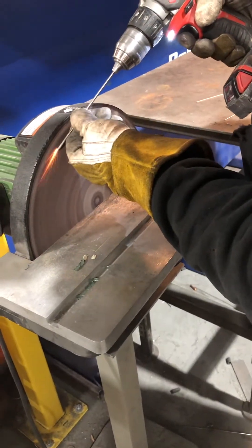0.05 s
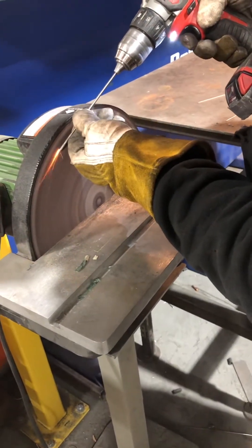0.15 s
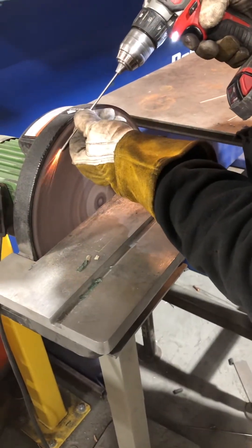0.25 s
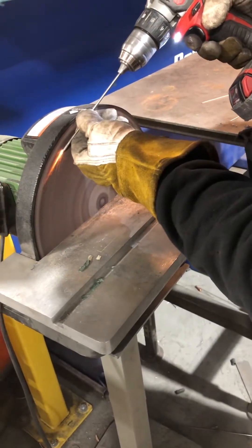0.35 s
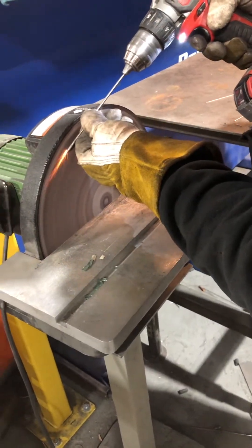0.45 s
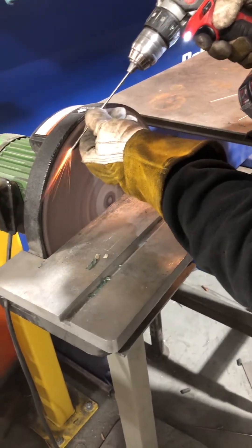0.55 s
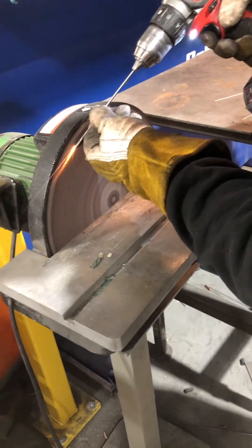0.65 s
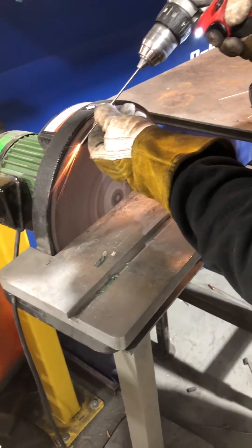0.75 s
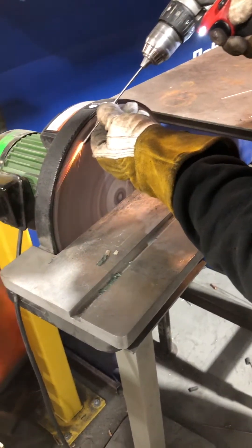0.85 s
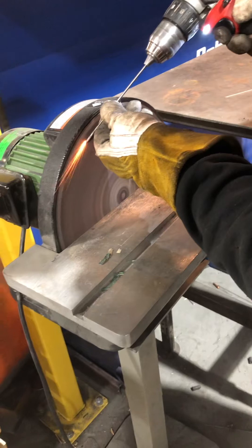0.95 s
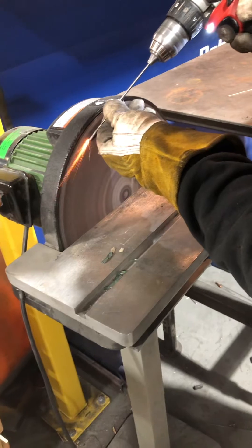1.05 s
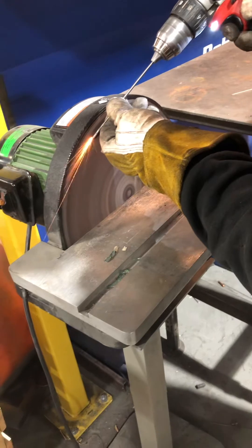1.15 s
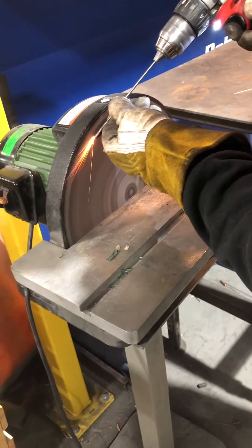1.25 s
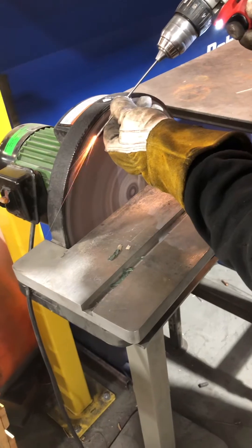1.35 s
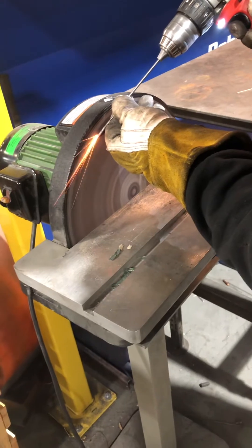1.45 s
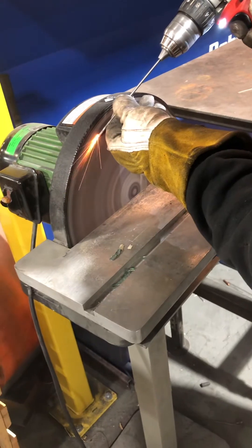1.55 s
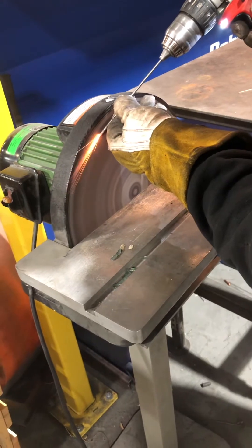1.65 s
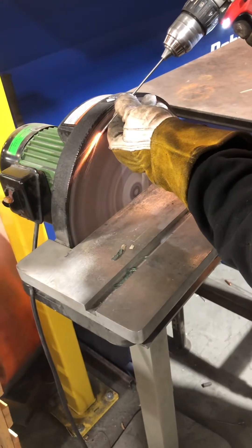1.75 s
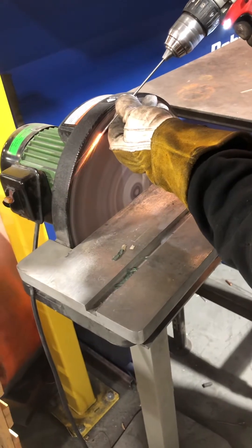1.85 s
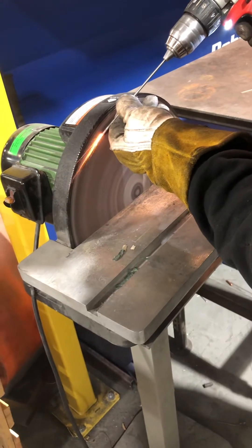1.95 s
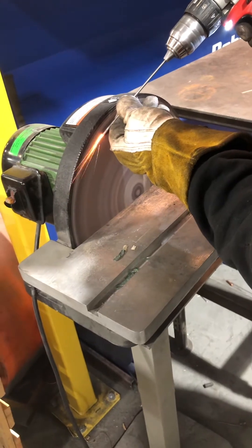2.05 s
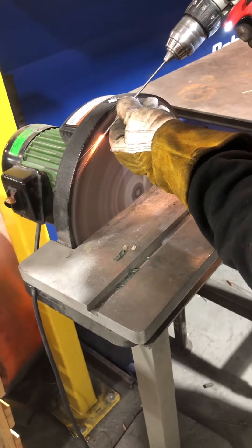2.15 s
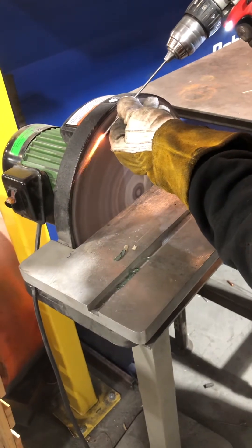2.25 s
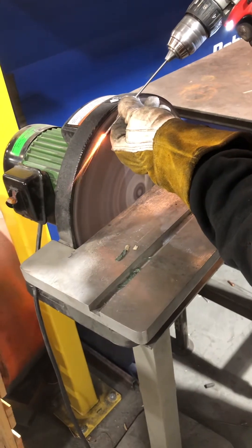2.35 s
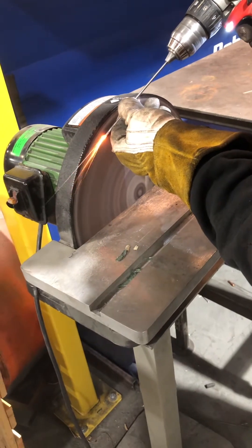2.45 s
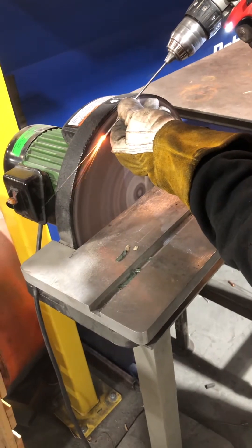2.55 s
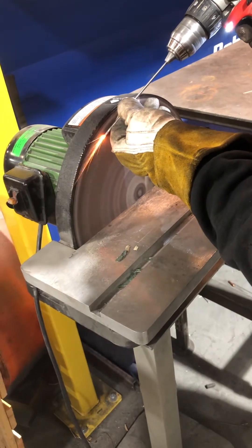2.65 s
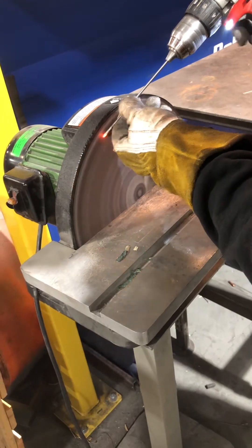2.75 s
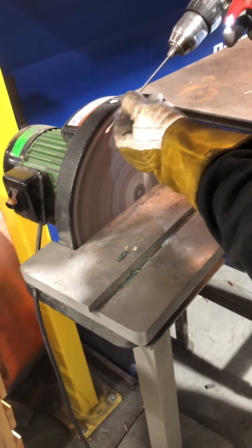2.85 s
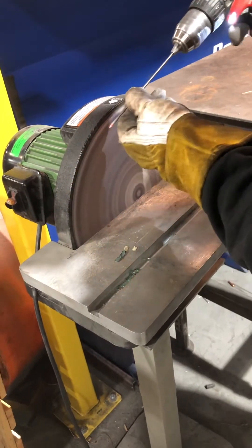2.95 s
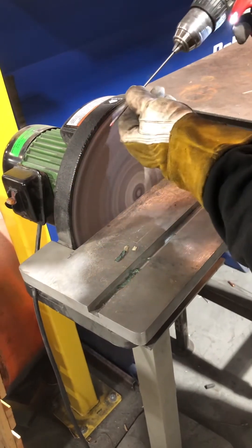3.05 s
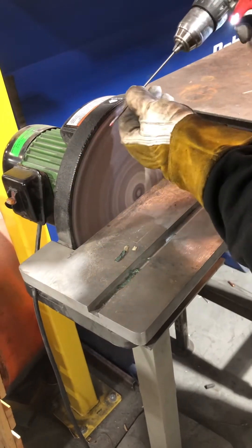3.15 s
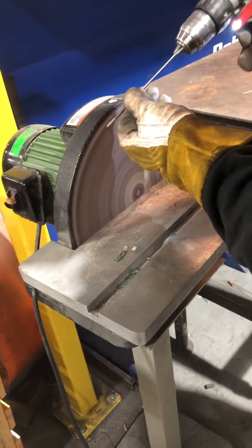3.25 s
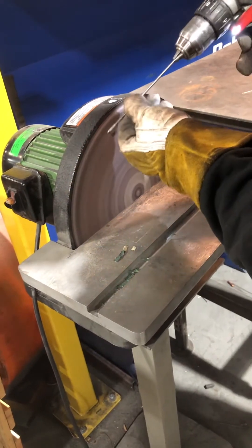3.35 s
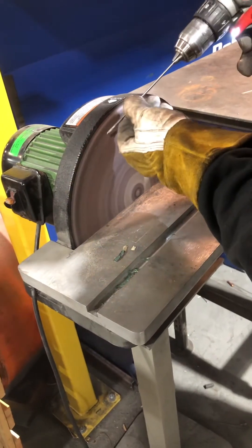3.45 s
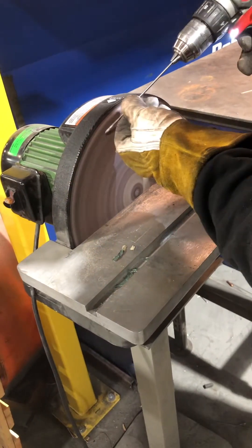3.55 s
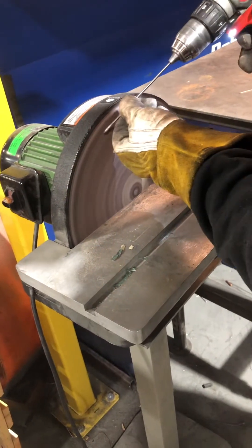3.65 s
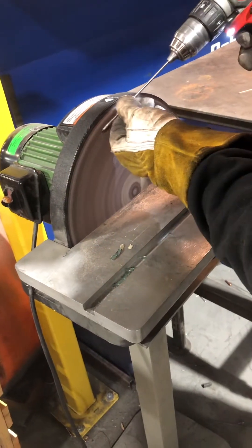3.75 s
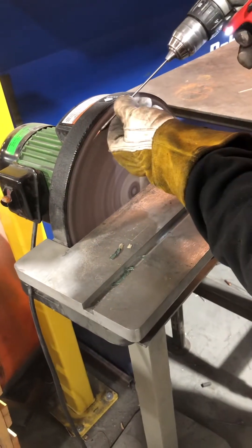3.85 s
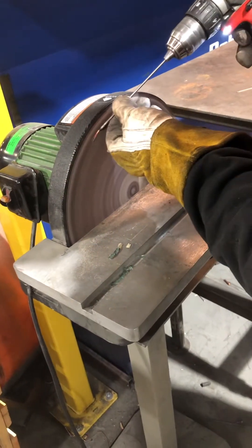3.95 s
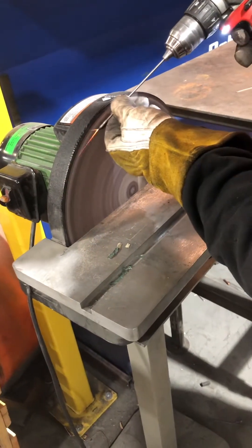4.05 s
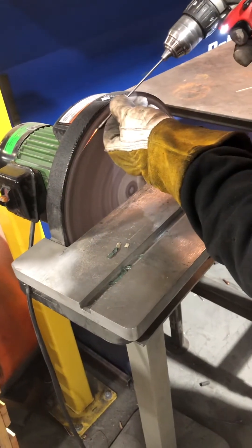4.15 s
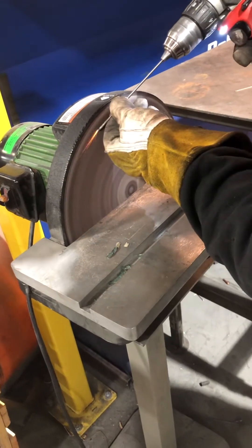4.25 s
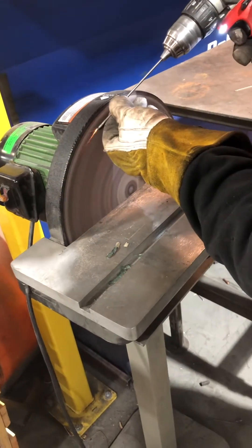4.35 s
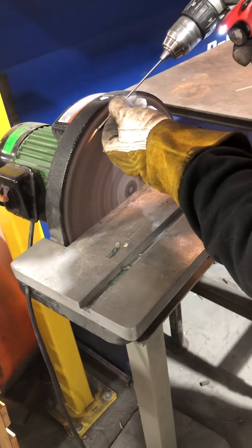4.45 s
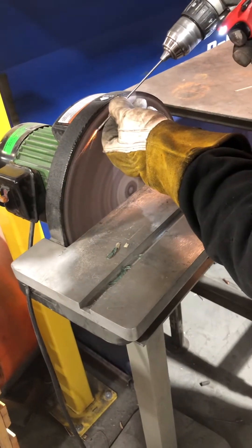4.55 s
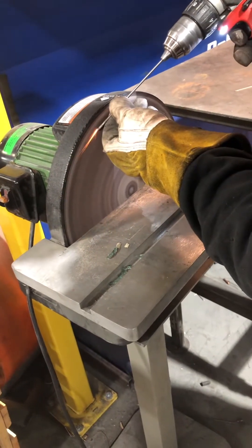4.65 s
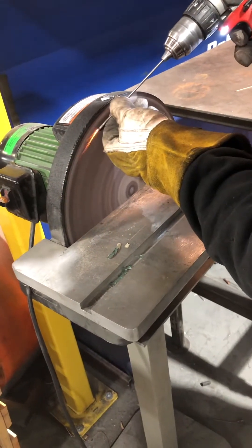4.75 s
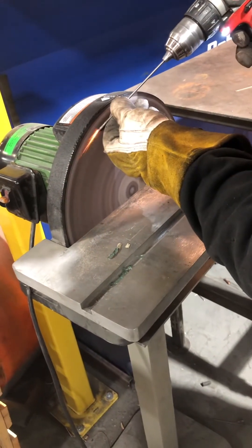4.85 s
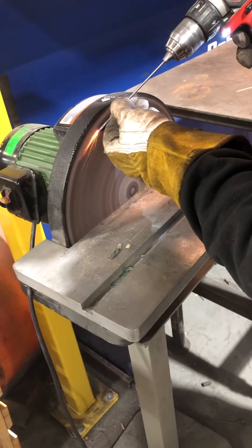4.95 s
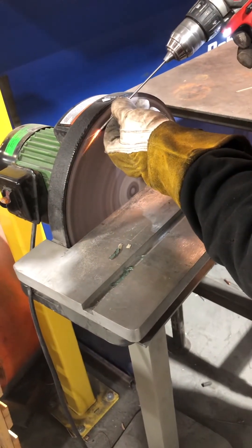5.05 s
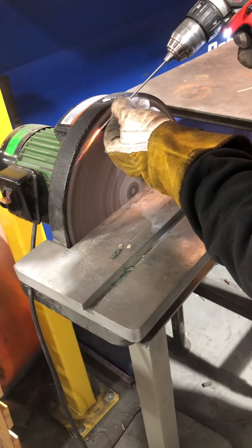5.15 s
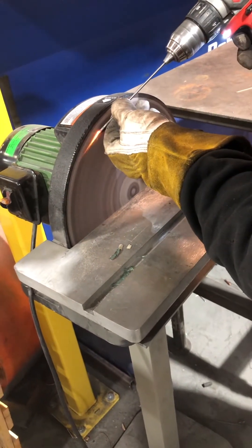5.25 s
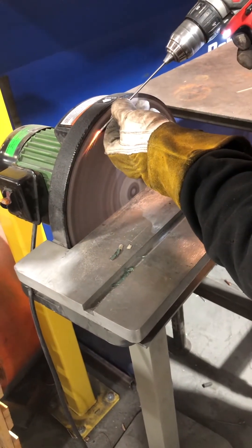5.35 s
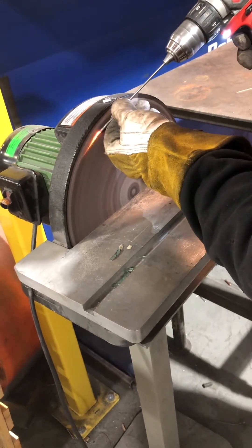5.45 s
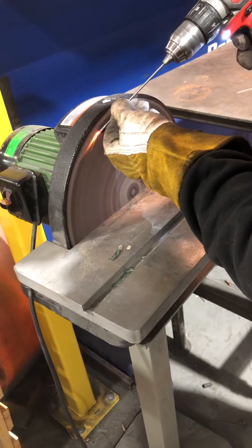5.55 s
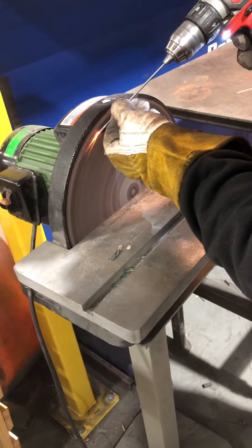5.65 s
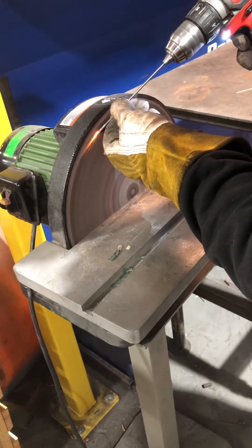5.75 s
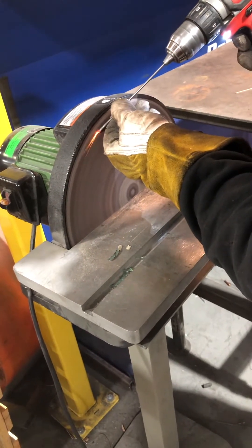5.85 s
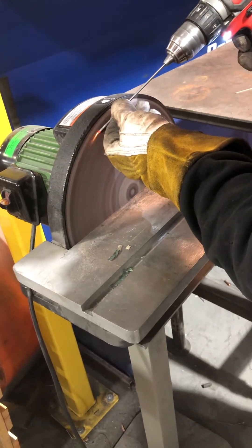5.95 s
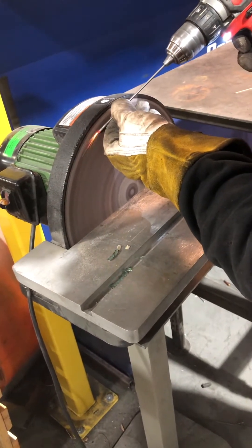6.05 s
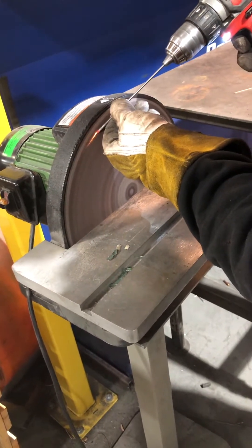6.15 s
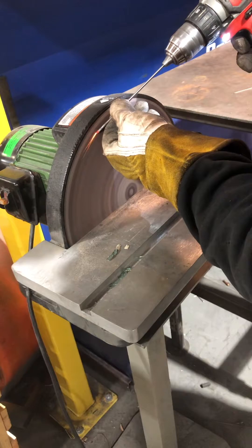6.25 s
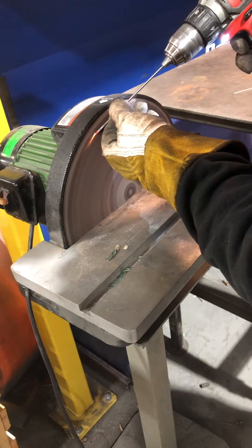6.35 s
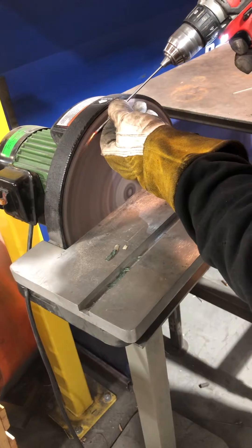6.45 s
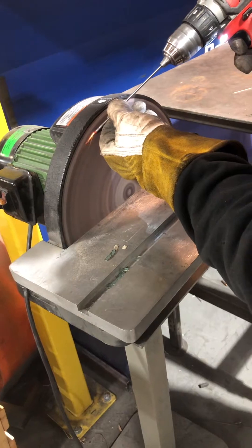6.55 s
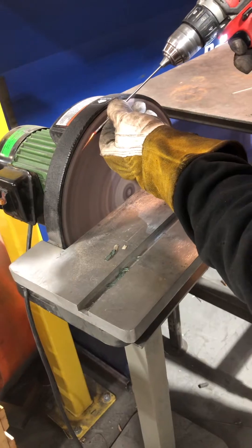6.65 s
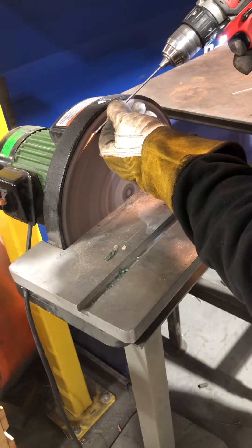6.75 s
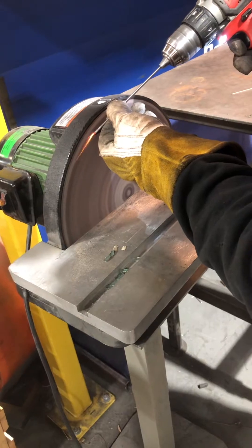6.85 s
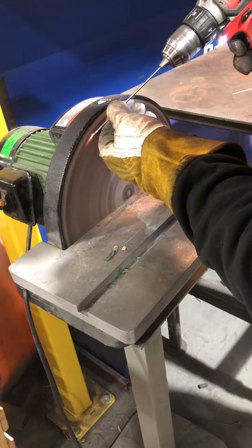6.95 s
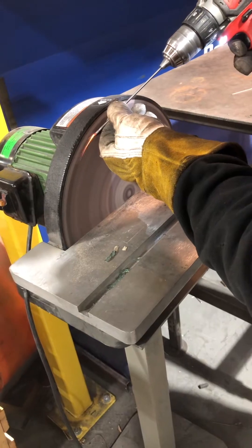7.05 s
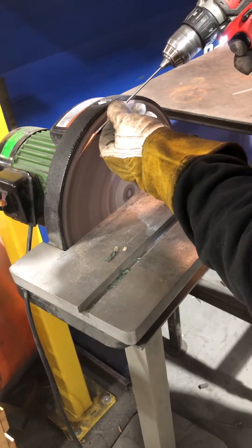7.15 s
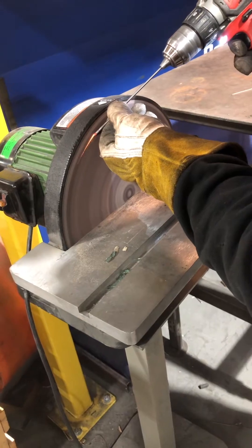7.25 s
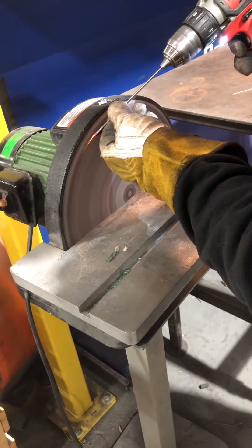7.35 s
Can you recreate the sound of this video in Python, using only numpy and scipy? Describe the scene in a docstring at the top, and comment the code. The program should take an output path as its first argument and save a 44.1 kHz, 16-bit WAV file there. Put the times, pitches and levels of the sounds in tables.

```python
"""At first a thin steel rod, spun by a cordless drill, is held against a running disc sander in a workshop.
The same grit comes round each turn and sets rod and disc ringing; high spots make the hiss throb.
Then the rod is lifted and the drill stops, leaving the sander's hum and rushing air.
The drill winds up with a rising gear tone, the rod skips on the disc, and grinding resumes.
At the end the drill is let go, and the rod lifts off with a short dull rub."""
import sys
import numpy as np
from scipy import signal
from scipy.fft import rfft, irfft, next_fast_len
from scipy.io import wavfile
from scipy.ndimage import uniform_filter1d, map_coordinates

SR = 44100
rng = np.random.default_rng(int(sys.argv[2]) if len(sys.argv) > 2 else 0)


def transcribe(signal):
    """Save signal, clipped to [-1, 1], as a 16-bit WAV file at the path in sys.argv[1]."""
    frames = np.atleast_2d(signal).T
    limited = np.clip(frames, -1, 1)
    pcm = np.round(limited * 32767).astype(np.int16)
    wavfile.write(sys.argv[1], SR, pcm)


N = 325885
T = np.arange(N) / SR  # time of every sample, s


def from_db(db):
    """Turn decibels into a gain."""
    return 10 ** (np.asarray(db) / 20)


def rms_one(x):
    """Scale a signal to rms 1."""
    return x / np.sqrt(np.mean(x ** 2) + 1e-20)


def in_time(rows):
    """Join the points of each column with straight lines, giving a value at every sample."""
    s, *columns = np.transpose(rows)
    return [np.interp(T, s, column) for column in columns]


def drift(rate):
    """Smooth random wandering of rms 1, with `rate` random points per second."""
    knots = rng.standard_normal(int(T[-1] * rate) + 3)
    return rms_one(map_coordinates(knots, [T * rate], order=3, mode="nearest"))


def coloured(x, spectrum):
    """Give a sound a smooth spectrum by weighting its frequencies; rms 1."""
    hz, db = np.transpose(spectrum)
    size = next_fast_len(N)
    bins = np.maximum(np.arange(size // 2 + 1) * SR / size, 1)
    gain = from_db(np.interp(np.log(bins), np.log(hz), db))
    return rms_one(irfft(rfft(x, size) * gain, size)[:N])


def resonate(x, modes):
    """Let a force ring several resonances side by side; wider ones die faster; rms 1."""
    out = 0
    for hz, width, db in modes:
        r = np.exp(-np.pi * width / SR)
        poles = [1, -2 * r * np.cos(2 * np.pi * hz / SR), r * r]
        out = out + from_db(db) * (1 - r * r) / 2 * signal.lfilter([1, 0, -1], poles, x)
    return rms_one(out)


def band(x, low_hz, high_hz):
    """Keep one band of frequencies; rms 1."""
    sos = signal.butter(2, [low_hz, high_hz], "band", fs=SR, output="sos")
    return rms_one(signal.sosfilt(sos, x))


def tone(hz):
    """A sine of rms 1 that follows a pitch curve."""
    return np.sqrt(2) * np.sin(2 * np.pi * np.cumsum(hz) / SR)


def swell(s, length_s):
    """A smooth rise and fall around one moment; height 1."""
    return np.exp(-((T - s) / length_s) ** 2)


def bump(turns, place, width, lean=0.27):
    """A hump that passes once a turn; lean makes its front steeper than its back."""
    past = (turns - place + .5) % 1 - .5
    side_width = width * (1 + np.clip(lean, 0, .8) * np.sign(past))
    return np.exp(-(past / side_width) ** 2)


def pressure(swing_db):
    """Contact force as a gain, evened out so its power over about one turn stays near 1."""
    force = from_db(swing_db)
    one_turn = 1480  # samples
    return force / np.sqrt(uniform_filter1d(force ** 2, size=one_turn))


def grit(turns, kept, grain_db):
    """Grains of uneven size round the disc; each turn keeps a share of the turn before."""
    shape = (256, 1480)  # turns, steps per turn
    kept = np.clip(kept, 0, .95)
    sizes_db = grain_db * np.minimum(rng.exponential(1, shape), 7)
    grains = rng.standard_normal(shape) * from_db(sizes_db)
    track = signal.lfilter([1], [1, -kept], grains, axis=0).ravel()
    # start ten turns in, when the carried-over pattern has built up
    return rms_one(track[((turns + 10) * shape[1]).astype(int)])


# the rod is held to the disc twice:
# (touch t/s, lift t/s, base hiss level/dB, base hiss swing level/dB over the high spots)
PASSES = [(-1, 2.59, -18.0, 5), (3.705, 7.275, -16.6, 8.5)]
# it lands lightly and is pressed home; the hiss takes only a share of that swell
SETTLE_S, LIGHT_TOUCH_DB, HISS_FOLLOWS = .4, -20, .55
# once lifted, the ring dies quickly and the hiss trails off
RING_RELEASE_DB_PER_S, HISS_RELEASE_DB_PER_S = 500, 190


def contact():
    """Touch, press home, hold, lift: gains of ring and hiss, and the swing over the high spots in dB."""
    ring, hiss, swing = 0, 0, 0
    for touch, lift, hiss_db, swing_db in PASSES:
        light_db = LIGHT_TOUCH_DB * np.clip(1 - (T - touch) / SETTLE_S, 0, 1)
        touched = T >= touch
        lifted_s = np.maximum(T - lift, 0)
        ring_db = light_db - RING_RELEASE_DB_PER_S * lifted_s
        pass_hiss_db = hiss_db + HISS_FOLLOWS * light_db - HISS_RELEASE_DB_PER_S * lifted_s
        ring = ring + touched * from_db(ring_db)
        hiss = hiss + touched * from_db(pass_hiss_db)
        swing = np.where(touched, swing_db, swing)
    return ring, hiss, swing


# resonances of the rod on the disc, in three groups: (f/Hz, width f/Hz, relative level/dB)
LOW_MODES = [(2178, 25, -3), (2302, 22, 4.5), (2381, 38, 2)]
MIDDLE_MODES = [(2562, 62, -13), (2708, 28, 0), (2850, 45, -7)]
HIGH_MODES = [(3674, 48, -13), (3786, 62, -5), (4134, 54, -4), (4437, 240, -7.5), (4600, 51, 4),
              (4756, 60, -7)]
# low and middle ring throb once a turn in bouts while the rod is held loosely:
# (middle t/s, half length t/s, depth level/dB in the middle group; the low group takes a share)
THROBS = [(1.07, .08, 11), (1.41, .17, 16), (1.97, .1, 12), (2.38, .16, 16)]
THROB_LIFT = .07  # dB of middle ring gained per dB of throb


def rod_ring(turns, force, levels_db, bite_db):
    """Grains ring the rod's three groups of resonances; low and middle throb in bouts, high follows the high spots."""
    low_db, middle_db, high_db = levels_db
    throb_db = sum(db * np.exp(-((T - s) / length) ** 6) for s, length, db in THROBS)
    # once a turn a push swells the low and middle ring of the loosely held rod
    push_db = throb_db * bump(turns, .03, .15, lean=0)
    low = from_db(low_db + 0.1) * band(resonate(force, LOW_MODES), 2144, 2500)
    low = low * pressure(.4 * push_db + 1.5 * drift(35))
    middle_gain = from_db(middle_db - 0.2 + THROB_LIFT * throb_db)
    middle = middle_gain * band(resonate(force, MIDDLE_MODES), 2410, 3160)
    middle = middle * pressure(push_db + 1.6 * drift(35))
    high_force = grit(turns, kept=0.57, grain_db=0.0) * pressure(0.78 * bite_db + 2.0 * drift(40))
    high = from_db(high_db + 1.0 * drift(28)) * band(resonate(high_force, HIGH_MODES), 3450, 4820)
    return low + middle + high


# resonances of the disc and its guard: (f/Hz, width f/Hz, relative level/dB)
DISC_MODES = [(367, 31, -10), (1043, 8, -11), (1269, 73, -13.5), (1327, 45, -11), (1430, 38, -24),
              (1720, 73, -18.5), (1802, 51, -15)]
# the disc's own ring: typical level, and its share of the swing of the rod's low ring
DISC_RING_DB, DISC_FOLLOWS = -35.6, .4


def disc_ring(force, low_db):
    """The grains' force also rings the disc and its guard, partly following the rod's low ring."""
    level_db = DISC_RING_DB + DISC_FOLLOWS * (low_db - low_db.mean()) + 1.1 * drift(25)
    return from_db(level_db) * band(resonate(force, DISC_MODES), 260, 2020)


# colour of the cutting hiss in each pass: (f/Hz, relative level/dB)
FIRST_HISS = [(400, -33.5), (1500, -10.5), (3200, -7.5), (5200, -9), (5900, -1.5), (7200, 2), (7900, -7.5),
              (9100, -2), (10200, -5.5), (11300, -3.5), (12400, -4.5), (13900, -3.5), (14700, 0),
              (15700, -2.5)]
SECOND_HISS = [(400, -23), (1500, -11.5), (3200, -6.5), (5200, -8), (6100, -3), (6800, 2), (8000, -7),
               (9050, 3), (10000, -5.5), (11000, -1), (12200, -5), (12900, -1), (14200, 0), (15700, -0.5)]


def cutting(turns, bite_db):
    """Grains tear off metal with a hiss that is louder and brighter the deeper they bite."""
    sparks = grit(turns, kept=0.19, grain_db=2.5) * pressure(bite_db + 0.92 * drift(200))
    # the colour switches between the passes
    hiss = np.where(T < 3.2, coloured(sparks, FIRST_HISS), coloured(sparks, SECOND_HISS))
    dull = signal.sosfiltfilt(signal.butter(2, 10500, fs=SR, output="sos"), hiss)
    bright = hiss - dull
    return dull + bright * pressure(0.31 * bite_db + 0.61 * drift(60))


# high spots round the disc: (place in turns, width in turns, height 0-1)
HIGH_SPOTS = [(-.02, 0.13, 0.91), (.47, 0.077, 0.71), (.7, 0.035, 0.2), (.84, 0.021, 0.6)]
# base level of the rod's resonances in each pass: (t/s, low level/dB, middle level/dB, high level/dB)
FIRST_RING = [(0.05, -28, -26, -21), (0.2, -28, -28, -20), (0.39, -33, -26, -20), (0.69, -28, -30, -20),
              (1.52, -32, -26, -22), (1.68, -33, -29, -20), (2.46, -32, -26, -21), (2.56, -29, -28, -23)]
SECOND_RING = [(4.12, -24, -30, -25), (4.25, -28, -31, -23), (5.18, -28, -22, -19), (5.64, -26, -25, -22),
               (5.74, -30, -37, -28), (5.98, -29, -32, -27), (6.8, -24, -26, -22), (6.92, -28, -29, -23),
               (7.19, -26, -24, -24), (7.25, -27, -29, -28)]
# depth of the chatter: (t/s, level/dB)
CHATTER = [(0, 2), (.6, 9), (1.4, 0), (4.7, 1.5), (5.5, 4), (5.85, 2.5), (6.5, 7), (7.3, 7.5)]
# the rod sits firmly at this level of its high ring; below it the hiss swings more and thins (dB per dB)
FIRM_DB, LOOSE_SWING, LOOSE_LOSS = -21, .5, .1


def grinding(turns):
    """Grains strike the rod: their force rings rod and disc, and the cutting itself hisses."""
    ring_gain, hiss_gain, swing_db = contact()
    levels_db = in_time([*FIRST_RING, *SECOND_RING])
    low_db, _, high_db = levels_db
    swing_db = swing_db + LOOSE_SWING * (FIRM_DB - high_db)
    spots = sum(height * bump(turns, place, width) for place, width, height in HIGH_SPOTS)
    bite_db = swing_db * spots
    chatter_db, = in_time(CHATTER)
    bounces = 5  # per turn
    chatter = chatter_db * np.cos(2 * np.pi * bounces * (turns + 0.082))
    # this force drives the rod's low and middle groups and the disc
    force = grit(turns, kept=0.63, grain_db=1.33) * pressure(chatter + 1.4 * drift(40))
    ring = rod_ring(turns, force, levels_db, bite_db) + disc_ring(force, low_db)
    hiss_change = from_db(LOOSE_LOSS * (high_db - FIRM_DB) + 0.66 * drift(40))
    return ring_gain * ring + hiss_gain * hiss_change * cutting(turns, bite_db)


# the drill's trigger is held twice: (pressed t/s, released t/s, base whine level/dB)
DRILL_RUNS = [(-2, 2.61, -37.5), (3.48, 7.25, -34.3)]
SPIN_UP_S, RUN_DOWN_S = .187, .19
# the whine comes in only near top speed and fades while braking
WHINE_POWER, BRAKING_POWER = 13, 7


def drill_motor():
    """The motor winds up towards top speed and brakes on release: share of top speed, gain of the whine."""
    share, whine_gain = 0, 0
    for pressed, released, db in DRILL_RUNS:
        winding_up = 1 - np.exp(-np.maximum(T - pressed, 0) / SPIN_UP_S)
        braking = np.exp(-(np.clip(T - released, 0, 1) / RUN_DOWN_S) ** 2)
        share = share + winding_up * braking
        whine_gain = whine_gain + from_db(db) * winding_up ** WHINE_POWER * braking ** BRAKING_POWER
    return share, whine_gain


# the drill's partials: (multiple of its motor speed, relative level/dB)
DRILL_ORDERS = [(1, -9), (2, -14.5), (15, 0.3), (30, -7.5)]


def drill_whine(speed, gain):
    """Hum and whine: sines locked to multiples of the motor speed."""
    return gain * sum(from_db(db + 1.2 * drift(25)) * tone(order * speed) for order, db in DRILL_ORDERS)


# colour of the drill's rush: (f/Hz, relative level/dB)
RUSH = [(150, -32), (600, -4), (1300, 0), (2500, -4.5), (4900, 3.5), (8000, -8), (10500, -3), (15500, -8)]
# fan rush and brush hiss at top speed, and the gears' rush while the speed changes
RUSH_DB, BRUSH_DB, STRAIN_DB = -39, -32, -36.3
BRUSH_POWER = 1.5  # brush hiss grows as this power of the speed


def drill_rush(share):
    """Noise of fan and brushes grows with speed; the gears' rush is strongest at half speed."""
    strain = np.sin(np.pi * share) ** 2
    rush_gain = np.hypot(from_db(RUSH_DB) * share, from_db(STRAIN_DB) * strain)
    rush = rush_gain * coloured(rng.standard_normal(N), RUSH)
    brush_gain = from_db(BRUSH_DB) * share ** BRUSH_POWER
    return rush + brush_gain * band(rng.standard_normal(N), 6000, 16000)


GEAR_ORDER, GEAR_DB, GEAR_PEAK_HZ, GEAR_WIDTH_HZ = 11, -38, 2500, 290


def gear_tone(speed, share):
    """A gear tone that sings out as it rises through the rod's resonances."""
    gear_hz = GEAR_ORDER * speed
    speeding_up = np.gradient(share) > 0
    nearness = np.exp(-((gear_hz - GEAR_PEAK_HZ) / GEAR_WIDTH_HZ) ** 2)
    return speeding_up * from_db(GEAR_DB) * nearness * tone(gear_hz)


TRIGGER_HZ, TRIGGER_S, TRIGGER_LENGTH_S, TRIGGER_DB = 7892, 3.48, .1, -54


def speed_control():
    """The drill's speed control sings one thin, steady tone while the trigger is half pressed."""
    return from_db(TRIGGER_DB) * swell(TRIGGER_S, TRIGGER_LENGTH_S) * tone(np.full(N, TRIGGER_HZ))


DRILL_TOP_SPEED = 363.6  # turns per s, before a slight drift


def drill():
    """The whole drill: whine, rush and gear tone follow one motor; its speed control adds a thin tone."""
    share, whine_gain = drill_motor()
    speed = share * (DRILL_TOP_SPEED + 0.202 * drift(25) + 0.15 * drift(2))
    return drill_whine(speed, whine_gain) + drill_rush(share) + gear_tone(speed, share) + speed_control()


# the sander's hum: (multiple of the disc speed, relative level/dB)
HUM = [(2, -16), (6, -6), (7.93, -6), (9.9, -10), (12.1, -4.5), (15.8, -15.5), (17, -18), (21, -15),
       (26, -12), (30, -22), (35, -11), (43.15, -7)]
# air stirred by disc and fan: (f/Hz, relative level/dB)
AIR = [(18, -53), (30, -37), (85, -5), (144, -6), (173, -5), (324, -6.5), (359, -1.5), (432, -13),
       (467, -8), (852, -15), (970, -10), (1200, -13.5), (1330, -13.5), (1870, -20.5), (5500, -28.5),
       (7500, -35.5), (15500, -39)]
# base level of hum and air together: (t/s, level/dB)
RUMBLE = [(0, -38.2), (1, -39.7), (2, -40.2), (2.7, -38.5), (3.35, -35.8), (3.85, -38.2), (7.2, -37.6),
          (7.39, -35)]
# low swells of the disc's wobble tone: (t/s, peak level/dB)
SWELLS = [(.72, -43.5), (1.93, -42), (3.16, -36.5), (3.57, -45), (4.15, -45), (6.15, -40), (7.26, -44.5)]
SWELL_S = .08


def sander(speed):
    """Motor and bearing hum, the wobble of the disc three times a turn, and rushing air."""
    rumble_db, = in_time(RUMBLE)
    hum = sum(from_db(db - 3 + 2.0 * drift(9)) * tone(order * speed + 1.0 * drift(12)) for order, db in HUM)
    air = from_db(3.0) * coloured(rng.standard_normal(N), AIR)
    swells = sum(from_db(db) * swell(s, SWELL_S) for s, db in SWELLS)
    wobble = tone(3 * speed)
    return from_db(rumble_db) * (hum + air) + swells * wobble


ROOM_T60_S = 0.46  # time for the echo to fall by 60 dB


def workshop(x, early_s=0.0095):
    """Diffuse reverberation from a fading noise tail, duller than the direct sound."""
    t = T[:SR]
    tail = rng.standard_normal(SR) * from_db(-60 * t / ROOM_T60_S) * (t > early_s)
    tail = signal.lfilter(*signal.butter(1, 9000, fs=SR), tail)
    return signal.fftconvolve(x, tail / np.sqrt(np.sum(tail ** 2)))[:N]


# the rod skips as it touches the disc again: (t/s, relative peak level/dB)
TAPS = [(3.7063, -7), (3.7262, 0), (3.7404, -12), (3.758, -2.5), (3.773, -11), (3.7958, -3.5), (3.8047, -7),
        (3.8247, -13), (3.8407, -8.5), (3.8586, -6.5), (3.8731, -7), (3.891, -4.5), (3.9064, -8),
        (3.922, -4.5)]


def taps(decay_s=0.003, high_pass_hz=6000):
    """The rod skips on the disc before it settles: short bright scratches of fading noise."""
    strength = sum(from_db(db - 5.5) * (T >= s) * np.exp(-np.abs(T - s) / decay_s) for s, db in TAPS)
    return strength * band(rng.standard_normal(N), high_pass_hz, 19700)


# the rod drags briefly as it leaves the disc: (t/s, length t/s, level/dB)
DRAG = [(7.334, 0.014, -28.5)]


def drag():
    """A short dull rub: one swell of low noise."""
    strength = sum(from_db(db) * swell(s, length) for s, length, db in DRAG)
    return strength * band(rng.standard_normal(N), 560, 1400)


START_TURN = .942  # where the disc stands at the start, in turns
# the disc's free speed, and how far it sags in the first and second pass (turns per s)
FREE_SPEED, SAGS = 29.974, (.23, .135)


def scene():
    """Grinding and sander follow the turning disc, which slows a little under the rod."""
    sag = sum(drop * (T >= touch) * (T < lift) for drop, (touch, lift, *_) in zip(SAGS, PASSES))
    speed = FREE_SPEED - sag
    turns = START_TURN + np.cumsum(speed) / SR
    work = grinding(turns) + taps() + drag()
    echo = from_db(-11.5) * workshop(work)
    return (work + echo + drill() + sander(speed))[None]


CUTOFF_HZ = 15830


def record(dry):
    """The highest peaks are rounded and the top is cut."""
    rounded = np.tanh(dry)
    low_pass = signal.firwin(401, CUTOFF_HZ, fs=SR)
    return signal.fftconvolve(rounded, low_pass[None], "same")


dry = scene()
out = record(dry)
transcribe(out)
```